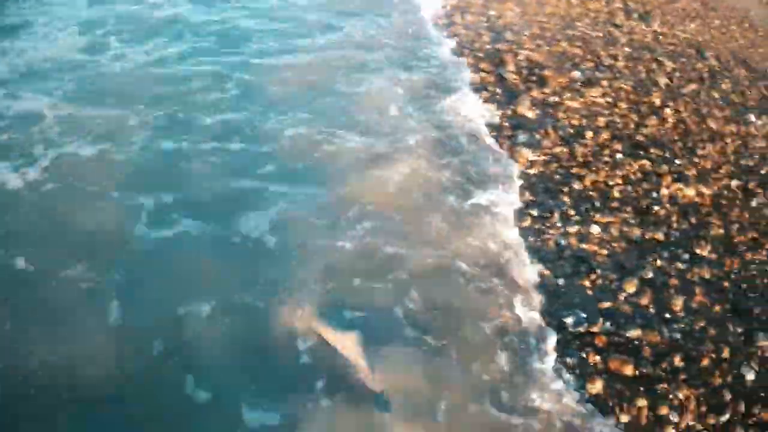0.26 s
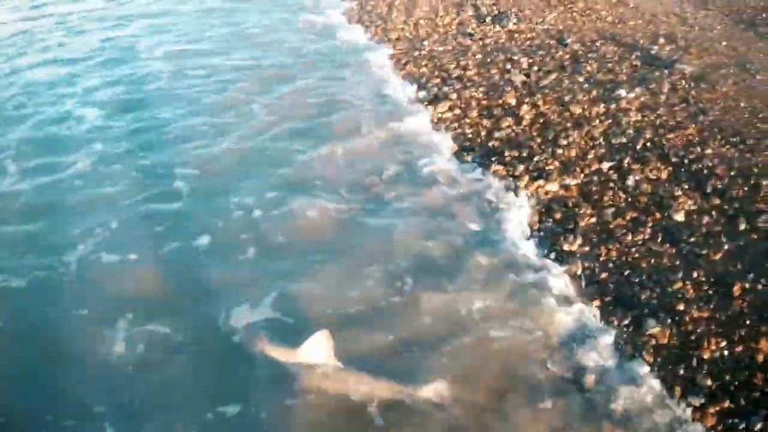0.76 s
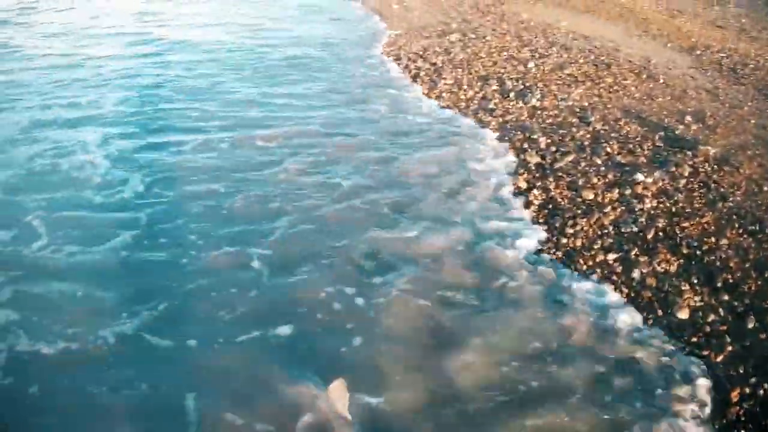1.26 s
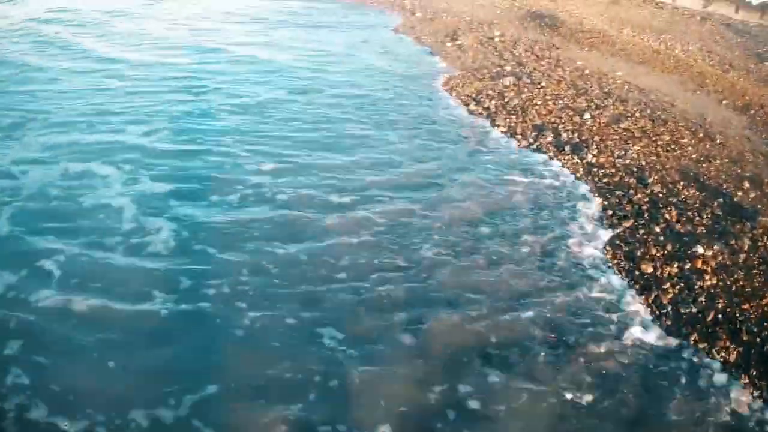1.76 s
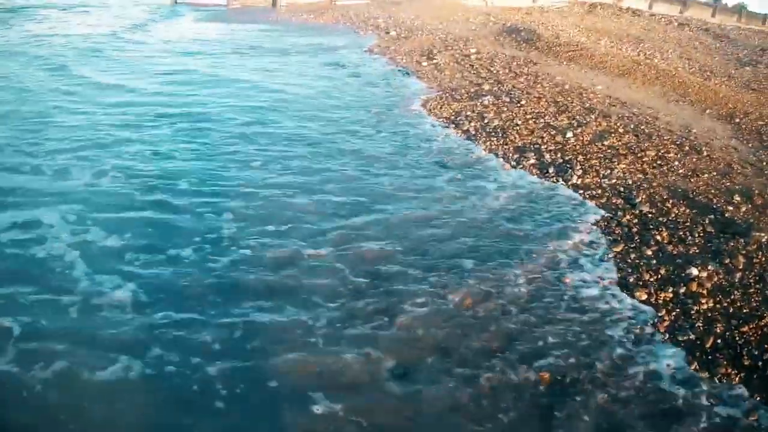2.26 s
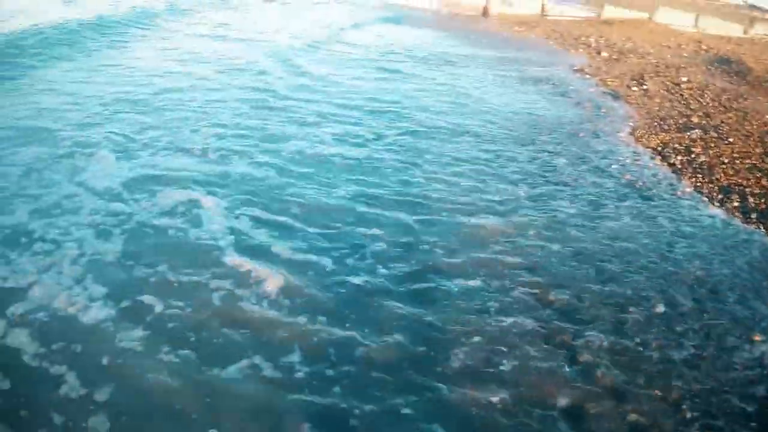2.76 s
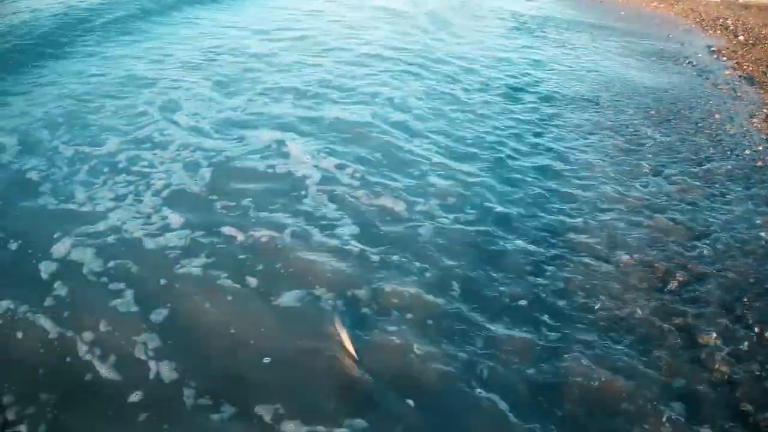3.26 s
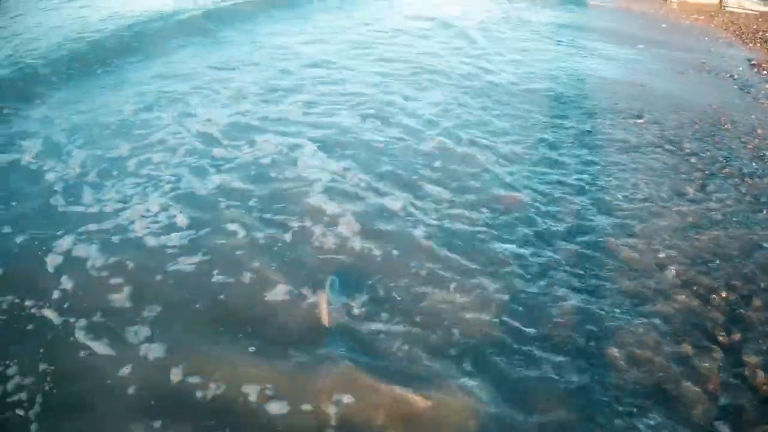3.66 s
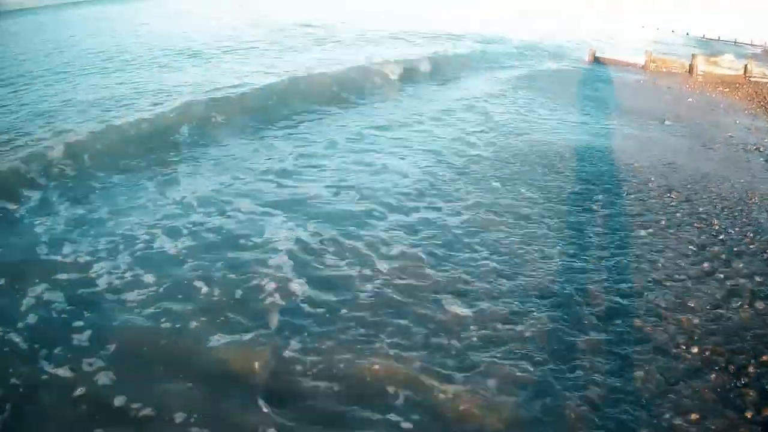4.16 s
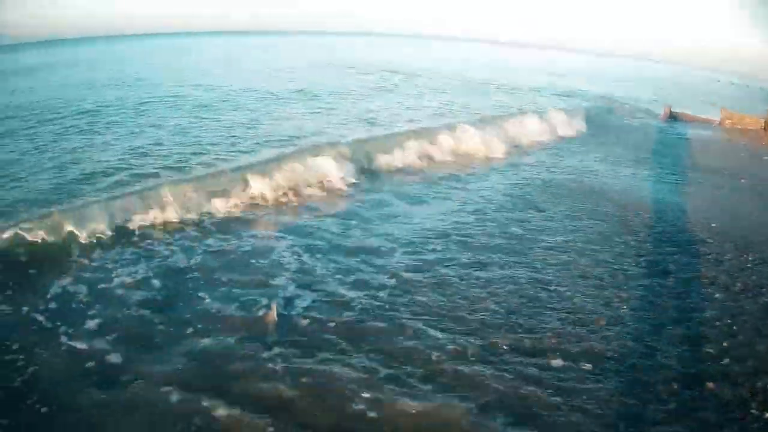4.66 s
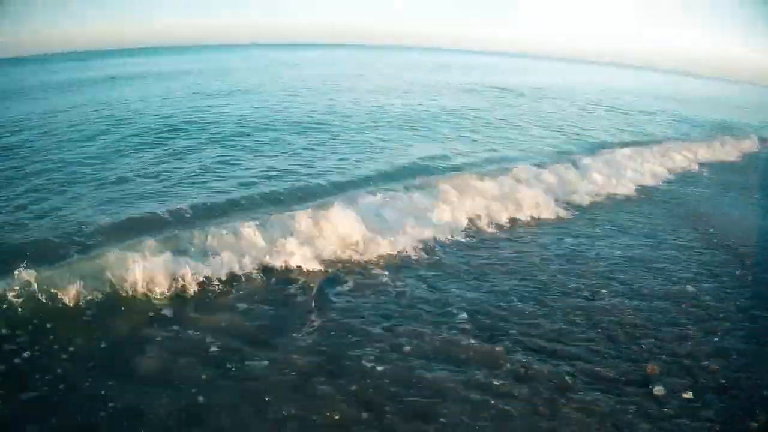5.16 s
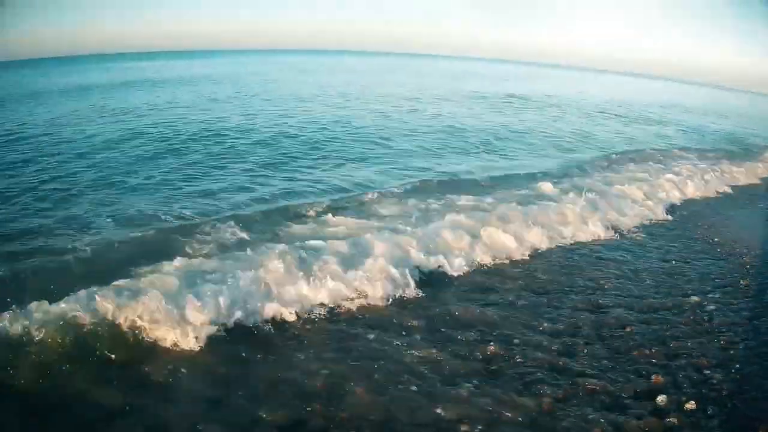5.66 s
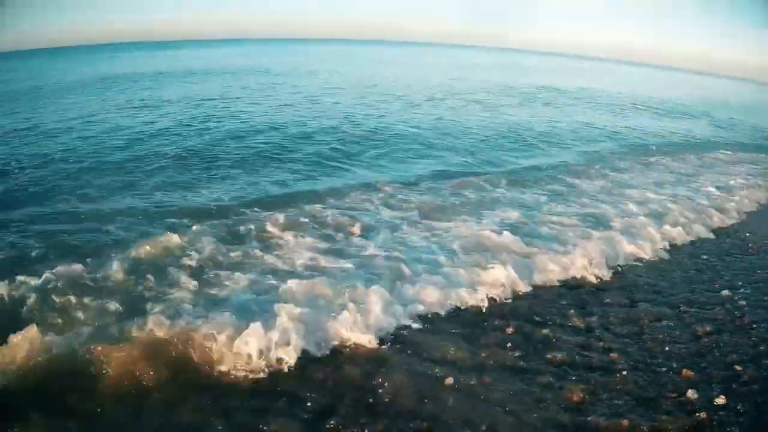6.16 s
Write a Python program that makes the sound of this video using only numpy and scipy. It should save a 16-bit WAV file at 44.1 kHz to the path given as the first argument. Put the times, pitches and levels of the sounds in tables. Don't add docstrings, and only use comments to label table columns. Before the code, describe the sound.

Muffled close shore water bubbles and fizzes down to a trickle, a sharp plastic knock sounds, then a breaker plunges and seethes up the stones.

```python
import sys
import numpy as np
from scipy import signal
from scipy.fft import rfft, irfft
from scipy.io import wavfile
from scipy.ndimage import uniform_filter1d

SR = 44100
rng = np.random.default_rng(int(sys.argv[2]) if len(sys.argv) > 2 else 0)


def undo_db(level):
    steps = np.asarray(level, float) / 20
    return 10 ** steps


def unload_audio(sound):
    columns = np.transpose(np.atleast_2d(sound))
    steps = np.round(np.clip(columns, -1, 1) * 32767)
    wavfile.write(sys.argv[1], SR, steps.astype(np.int16))


N = 282668
TIME = np.arange(N) / SR

# time in seconds, level of the bubbling in dB.
SURF = [(0, -35.5), (.57, -30), (.89, -27.5), (1.21, -32.5), (1.64, -43.5), (1.93, -53), (2.33, -63),
        (2.48, -55.5), (2.82, -59.5), (3.02, -65), (3.36, -65), (4.25, -57), (4.4, -44.5), (4.52, -34.5),
        (4.62, -29.5), (5.21, -27.5), (5.75, -30.5), (6.41, -34)]


def rms_one(x):
    return x / np.sqrt(np.mean(x ** 2) + 1e-20)


def at_hz(points, hz):
    points = np.array(points)
    return np.interp(np.log(hz), np.log(points[:, 0]), points[:, 1])


def band(x, low_hz, high_hz, order=2):
    edges = [low_hz, min(high_hz, .45 * SR)]
    return signal.sosfilt(signal.butter(order, edges, "band", fs=SR, output="sos"), x)


def lifted(x, from_hz, lift_db):
    top = signal.sosfilt(signal.butter(2, from_hz, "high", fs=SR, output="sos"), x)
    return x + (undo_db(lift_db) - 1) * top


def levelled(x, low_hz, high_hz, level_db):
    return x * undo_db(level_db) / np.std(band(x, low_hz, high_hz, order=4))


def placed(sound, s):
    out, at = np.zeros(N + len(sound)), round(s * SR)
    out[at:at + len(sound)] = sound
    return out[:N]


def drift(rate):
    r = np.exp(-80 * np.pi * rate / SR)
    chance = rng.standard_normal(N // 40 + 2002)
    slow = signal.lfilter([1], [1, -2 * r, r * r], chance)[2000:]
    return np.interp(np.arange(N) / 40, np.arange(len(slow)), rms_one(slow))


def swell(s, peak_db, rise_db_s, hold_s, fall_db_s):
    still_to_come, since_hold = np.maximum(s - TIME, 0), np.maximum(TIME - s - hold_s, 0)
    return peak_db - rise_db_s * still_to_come - fall_db_s * since_hold


def together(*levels_db):
    return 10 * np.log10(sum(undo_db(2 * db) for db in levels_db))


def follow(layer):
    # arrival in seconds, time until spent in seconds.
    waves = [
        (0, 1.27),
        (5.0, 1.5),
    ]
    # dB at full surf, share of its swing, lag in seconds,
    # ageing in dB per second.
    follows = dict( plunge=[(-38.5, 0.47, 0.066, -6.5), (-30.5, 1, 0.087, -6.5)],
               fizz=[(-54.5, 0.57, 0.012, -5.5), (-49.5, 1, 0.023, 1.3)], spray=[(-59, .62, 0, -3.0),
               (-56.5, 1, 0.074, 0.7)], small=[(3.5, 0.033, 0.015, -2), (-6.5, 0.056, 0, -6)],
               mist=[(4.5, -.12, 0, 1.5), (1, .03, 0, 0)], boom=[(-57, .08, 0, -4.0),
               (-45.5, 1.15, .24, -10)], stones=[(-53.5, 1.05, 0.046, -1.3), (-72, .4, .1, -7)])
    full_db = -30
    s, vigour_db = np.transpose(SURF)
    levels_db = []
    for (db, share, lag, ageing), (start, spent) in zip(follows[layer], waves):
        swing_db = np.interp(TIME - lag, s, vigour_db) - full_db
        levels_db.append(db + share * swing_db + ageing * np.clip(TIME - start, 0, spent))
    wash, breaker = levels_db
    return wash + (breaker - wash) * np.clip((TIME - 3.6) / .55, 0, 1)


def with_laps(layer, count):
    # time in seconds, then slop, fizz and rolled pebbles in dB.
    small_laps = [(.5, -52, -54, -52), (1.45, -49, -69, -79), (1.6, -49.5, -72, -76),
                  (1.74, -44.5, -67, -81), (2.47, -58, -76, -78), (2.74, -61, -75, -75),
                  (3.75, -61.5, -86, -92), (4.05, -67, -89, -92), (4.63, -30.5, -55, -80),
                  (5.32, -44, -50.5, -75)]
    laps_db = [swell(row[0], row[count], rise_db_s=110, hold_s=0.039, fall_db_s=154) for row in small_laps]
    return together(follow(layer), *laps_db)


def housing(x):
    # centre in Hz, width in Hz, gain in dB.
    resonances = [(840, 348, 11), (2130, 250, 3.5), (2780, 630, -9.5), (3380, 560, 7), (4200, 780, 5.5),
                  (4920, 590, 5.5), (7580, 340, -4), (9420, 1900, 14), (10800, 550, -4), (13900, 500, 1),
                  (3630, 180, -3.5), (4550, 210, 0), (8500, 400, 1)]
    for hz, width_hz, gain_db in resonances:
        a, w = undo_db(gain_db / 2), 2 * np.pi * hz / SR
        k = np.sin(w) * width_hz / hz / 2
        x = signal.lfilter([1 + k * a, -2 * np.cos(w), 1 - k * a], [1 + k / a, -2 * np.cos(w), 1 - k / a], x)
    return x


def water(colour, bursts_per_s, size_db, grain_share, patchy_db, surge_db):
    low_hz, high_hz = colour[0][0], colour[-1][0]
    edges = low_hz * 2 ** np.arange(0, np.log2(high_hz / low_hz) + .01, 1 / 3)
    sizes = np.minimum(rng.exponential(1, (2, N)), 5)
    bursts = undo_db(size_db * sizes) * rng.choice([-1, 1], (2, N))
    bursts = bursts * (rng.random((2, N)) < bursts_per_s / SR)
    share = np.clip(grain_share, 0, 1)
    drive = np.sqrt(share) * rms_one(bursts) + np.sqrt(1 - share) * rng.standard_normal((2, N))
    out = 0
    for k, (low, high) in enumerate(zip(edges, edges[1:])):
        gain = undo_db(at_hz(colour, np.sqrt(low * high)) + patchy_db * drift(20.6) + surge_db)
        rolled = np.roll(drive[k % 2], k * 4001)
        run_in = np.r_[rolled[-2000:], rolled]
        out = out + gain * band(run_in, low, high)[2000:]
    return housing(out)


def sea():
    # pitch in Hz, density in dB per Hz.
    plunge_colour = [(70, -12), (100, -25.5), (140, -4.5), (200, -1.5), (320, 1.5), (480, -2.5), (800, -16)]
    wash_colour = [(150, -41.5), (300, -12), (500, -3), (800, -0.5), (1200, -6), (1700, -10), (2300, -22),
                   (3200, -28)]
    fizz_colour = [(2000, 8), (3000, 7), (4500, -7), (6000, 1.5), (7500, -7.5), (10000, -26), (15000, -27)]
    spray_colour = [(6000, -33), (8000, -8), (9500, -3), (11000, -1.5), (13000, -3), (15500, -9)]
    wash_db = np.interp(TIME, *np.transpose(SURF))
    plunge_db, fizz_db = with_laps("plunge", count=1), with_laps("fizz", count=2)
    spray_db = follow("spray")
    slop = 0.86 * drift(5.4) + 1.15 * drift(27)
    plunge = water(plunge_colour, 150, size_db=4.5, grain_share=0.18, patchy_db=1.5, surge_db=0.31 * slop)
    wash = water(wash_colour, 500, size_db=1.5, grain_share=0.32, patchy_db=1.44, surge_db=0.84 * slop)
    fizz = water(fizz_colour, 2500, size_db=3.5, grain_share=.4, patchy_db=.8, surge_db=.45 * slop)
    spray = water(spray_colour, 6000, size_db=3.0, grain_share=.2, patchy_db=.35, surge_db=.35 * slop)
    wash = lifted(wash, 1120, follow("small"))
    spray = lifted(spray, 12000, follow("mist"))
    low = levelled(plunge, 150, 450, plunge_db) + levelled(wash, 600, 1100, wash_db)
    high = levelled(fizz, 2630, 7800, fizz_db - 2.5) + levelled(spray, 8800, 10500, spray_db - 0.3)
    return low + high


def wind():
    # time in seconds, level in dB.
    gusts = [(0, -51), (.3, -54), (.93, -50), (1.7, -54.5), (2.7, -55.5), (3.2, -64), (3.45, -63),
             (3.84, -54.5), (4.16, -59), (4.71, -50), (5.21, -55), (5.68, -53), (6.2, -55)]
    breeze_db = -63.5
    lumps = band(rng.standard_normal(N + SR), 7.4, 45.6)[SR:]
    gusts_db = [swell(s, db, rise_db_s=43, hold_s=0, fall_db_s=27) for s, db in gusts]
    return undo_db(together(breeze_db, *gusts_db) + 1.3 * drift(2.5) + 4.0) * rms_one(lumps)


def self_noise():
    # pitch in Hz, density in dB.
    hiss_colour = [(880, -38), (1880, -7), (2160, 1.5), (2840, -7), (7150, -5), (9240, -3.5), (14500, -2),
                   (15700, -8)]
    hz = np.maximum(np.fft.rfftfreq(N, 1 / SR), 1)
    spectrum = rfft(rng.standard_normal(N)) * undo_db(at_hz(hiss_colour, hz))
    return undo_db(-71) * rms_one(irfft(spectrum, N))


def boom():
    # pitch in Hz, density in dB per Hz.
    boom_colour = [(45, -39), (70, -3.5), (95, 7.5), (125, -4.5), (190, -0.5)]
    rumble = water(boom_colour, 60, size_db=1.5, grain_share=0.15, patchy_db=2.1, surge_db=0)
    pocket_db = swell(4.78, -35, rise_db_s=105, hold_s=0.25, fall_db_s=91.5)
    return levelled(rumble, 75, 113, together(follow("boom"), pocket_db))


def pebbles():
    # pitch in Hz, density in dB per Hz.
    stone_colour = [(3000, -11), (4000, -12), (4900, -2), (5900, -4), (7000, -10.5), (9000, -22)]
    clumps_db = 1.8 * drift(12)
    rattle = water(stone_colour, 2300, size_db=5.5, grain_share=0.25, patchy_db=-0.2, surge_db=clumps_db)
    return levelled(rattle, 3400, 7000, with_laps("stones", count=3))


def bubbles(table, swell_s, cycles, rise):
    out, age = 0, np.arange(SR // 5) / SR
    for s, db, hz in table:
        shape = (1 - np.exp(-age / swell_s)) * np.exp(-age * hz / cycles)
        tone = np.sin(2 * np.pi * hz * age * (1 + rise * age))
        out = out + placed(undo_db(db) * shape / shape.max() * tone, s)
    return out


def glugs():
    # start in seconds, peak in dB, pitch in Hz.
    slops = [(0.152, -19.5, 654), (0.215, -25.5, 925), (0.378, -24.5, 770), (0.564, -20, 920),
             (0.593, -20.5, 825), (0.678, -17, 808), (0.76, -19.5, 730), (0.853, -18, 850),
             (0.89, -16.5, 833), (0.972, -16.5, 842), (1.007, -16.5, 847), (1.553, -37, 864),
             (1.584, -39, 870), (1.638, -31.5, 810), (1.993, -45, 870), (2.72, -46.5, 520),
             (2.848, -46.5, 754), (4.303, -44, 850), (5.185, -17.5, 808), (6.253, -29, 870)]
    gurgles = [(.03, -29.5, 406), (.059, -28, 434), (.105, -20.5, 756), (.112, -23, 465),
               (.165, -32.5, 152.5), (.21, -40, 147), (.25, -29, 402), (.278, -29, 367), (.33, -27.5, 700),
               (.385, -22.5, 437), (.487, -29, 606), (.631, -28.5, 440), (.735, -27, 433),
               (.785, -27.5, 490), (1.142, -32.5, 463), (1.335, -28, 840), (1.435, -28.5, 800),
               (1.72, -40, 296), (2.58, -62, 1380), (2.62, -67, 1340), (2.77, -58, 1300),
               (2.829, -50.5, 342), (3.11, -51, 89), (3.74, -50, 145), (3.76, -50.5, 293),
               (4.106, -49, 280), (4.858, -29, 195), (4.91, -22, 105.3), (5.698, -37, 450),
               (6.265, -32, 480)]
    return bubbles(slops, 0.00088, 5.3, 2.77) + bubbles(gurgles, 0.00096, 4.0, 2.44)


def ring(clicks, hz, t60):
    r, w = undo_db(-60 / (t60 * SR)), 2 * np.pi * hz / SR
    return signal.lfilter([0, np.sin(w)], [1, -2 * r * np.cos(w), r * r], clicks + 1e-18)


def knocks():
    # start in seconds, push or pull, level in dB, pitch in Hz, t60 in seconds.
    tick = [(.41955, -1, -14, 1400, .007), (.41985, 1, -11.5, 1050, .008), (.4198, 1, -24, 2000, .006)]
    jolts = [
        (2.4290, 1, -26, 50, .05),
        (2.4368, -1, -20.5, 32, .105),
    ]
    # start in seconds, flesh in dB, nail in dB, shell pitch in Hz.
    contacts = [(2.4241, -30, -48, 640), (2.4260, -23, -32.5, 600), (2.4277, -15.5, -25, 550),
                (2.4298, -16.5, -37, 686), (2.4326, -16.5, -48, 690), (2.4335, -30, -29, 700),
                (2.4351, -11.5, -53, 743), (2.4386, -17, -42, 700)]
    # pitch in Hz, dB over the nail, t60 in seconds.
    shell = [(1020, 3.5, 0.013), (1940, 2, 0.0086)]
    # pitch in Hz, dB over the nail, decay in seconds.
    nail_crack = [(3400, -4, 0.00069), (4910, -1.5, 0.00097), (7560, 0, 0.00052)]
    # start in seconds, level in dB, pitch in Hz, decay in seconds.
    rattles = [
        (.4195, -32, 4850, .0008),
        (.4194, -39, 6800, .0004),
        (2.442, -55, 5500, .048),
    ]
    shell_cycles, overtone, overtone_db = 11.7, 1.2, -21
    click, age = (np.arange(SR // 4) == 0) * 1., np.arange(SR // 8) / SR
    soft = signal.lfilter([.22], [1, -.78], click)
    thuds = [(s, 1, db, hz, shell_cycles / hz) for s, db, _, hz in contacts]
    thuds += [(s, 1, db + overtone_db, hz * overtone, t60) for s, _, db, hz, t60 in thuds]
    cracks = list(rattles)
    for s, _, nail_db, _ in contacts:
        thuds += [(s, 1, nail_db + db, hz, t60) for hz, db, t60 in shell]
        cracks += [(s, nail_db + db, hz, decay) for hz, db, decay in nail_crack]
    out = np.zeros(N)
    for s, push, db, hz, t60 in tick + thuds + jolts:
        out = out + placed(np.sign(push) * undo_db(db) * ring(soft, hz, t60), s)
    for s, db, hz, decay in cracks:
        noise = rng.standard_normal(len(age))
        crack = band(noise * np.exp(-age / decay), hz * 0.9, hz * 1.124)
        out = out + placed(undo_db(db) * crack / np.max(np.abs(crack)), s)
    return out


def trickle():
    # pitch in Hz, density in dB per Hz.
    drip_colour = [(1920, -3), (2150, 0), (2450, -3)]
    # time in seconds, level in dB.
    spurts = [(2.5, -70), (2.74, -67)]
    rise_db_s, fall_db_s = 140, 120
    drips = water(drip_colour, 900, size_db=3.0, grain_share=.2, patchy_db=1.2, surge_db=0)
    spurts_db = [swell(s, db, rise_db_s, 0, fall_db_s) for s, db in spurts]
    seep_db = swell(2.2, -78, rise_db_s, 1.27, fall_db_s)
    return levelled(drips, 1750, 2540, together(seep_db, *spurts_db))


def peeps():
    # middle in seconds, pitch in Hz, length in seconds.
    notes_far_off = [
        (3.205, 9050, .03),
        (3.443, 9300, .012),
    ]
    out = np.zeros(N)
    for s, hz, length in notes_far_off:
        out = out + undo_db(-66) * np.exp(-((TIME - s) / length * 2) ** 2) * np.sin(2 * np.pi * hz * TIME)
    return out


def scene():
    water_sounds = sea() + boom() + pebbles() + glugs() + trickle()
    return (water_sounds + wind() + self_noise() + knocks() + peeps())[None]


def thinned_treble(x, margin_db, tilt_db, chance_db):
    hz, _, z = signal.stft(x, SR, nperseg=2048, noverlap=1024)
    bands = z[:, :1024].reshape(len(x), 128, 8, -1)
    level_db = 10 * np.log10(np.mean(np.abs(bands) ** 2, axis=2) + 1e-20)
    centre = hz[4:1024:8, None]
    around_db = 10 * np.log10(uniform_filter1d(undo_db(2 * level_db), size=15, axis=1))
    need_db = around_db - margin_db + tilt_db * (centre / 15000) ** 3
    need_db = need_db + chance_db * rng.standard_normal(level_db.shape)
    kept = (level_db > need_db) | (centre < 6500)
    z[:, :1024] = (bands * kept[:, :, None]).reshape(len(x), 1024, -1)
    return signal.istft(z, SR, nperseg=2048, noverlap=1024)[1][:, :N]


def top_cut(x):
    return signal.sosfilt(signal.butter(12, 15740, fs=SR, output="sos"), x)


def record(dry):
    # start in seconds, end in seconds.
    dull_spells = [
        (0.398, .4245),
        (2.410, 2.441),
    ]
    spells = sum((TIME > a) & (TIME < b) for a, b in dull_spells) * 1.
    lost = uniform_filter1d(spells, size=100)
    dull = signal.sosfiltfilt(signal.ellip(10, .1, 50, 8700, fs=SR, output="sos"), dry)
    holed = thinned_treble(dry, margin_db=8.5, tilt_db=5, chance_db=1.5)
    mix = holed + lost * (dull - holed)
    mix = signal.sosfilt(signal.ellip(10, .1, 60, 15740, fs=SR, output="sos"), mix)
    return top_cut(mix)


dry = scene()
out = record(dry)
unload_audio(out)
```